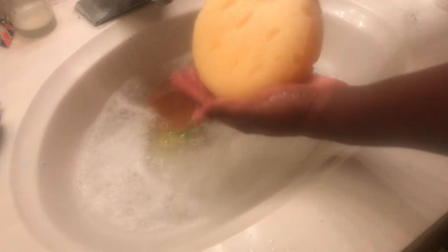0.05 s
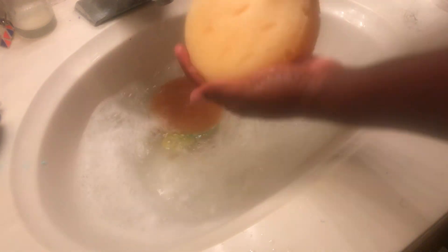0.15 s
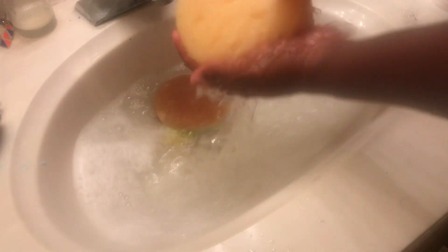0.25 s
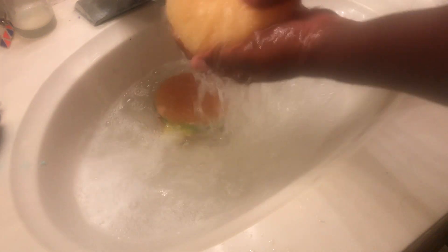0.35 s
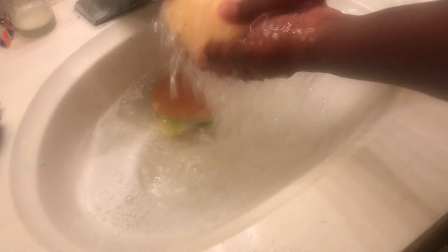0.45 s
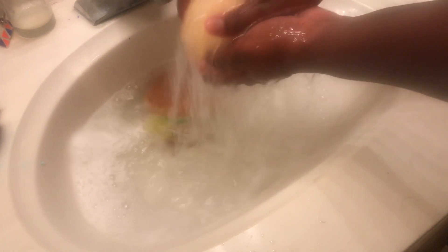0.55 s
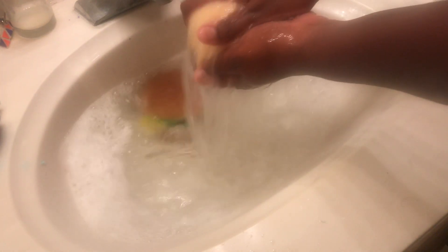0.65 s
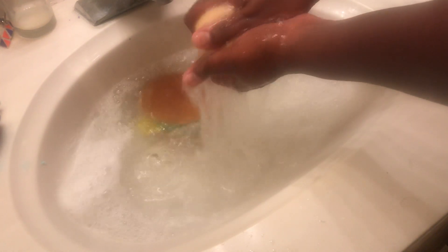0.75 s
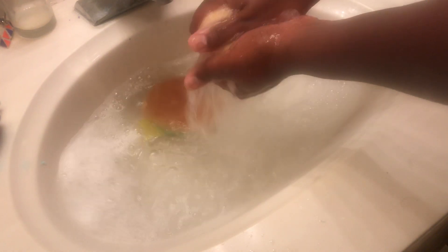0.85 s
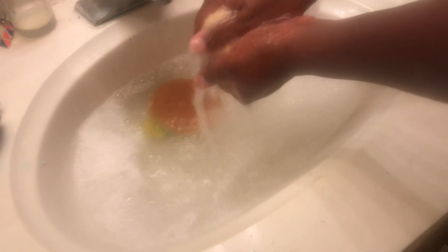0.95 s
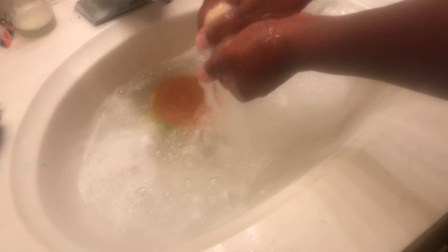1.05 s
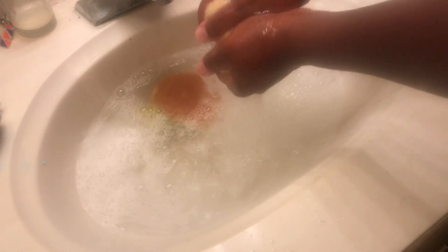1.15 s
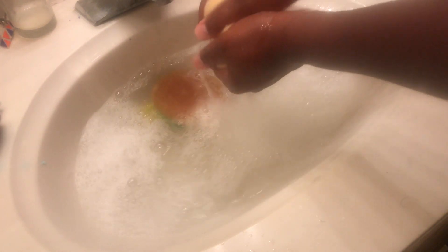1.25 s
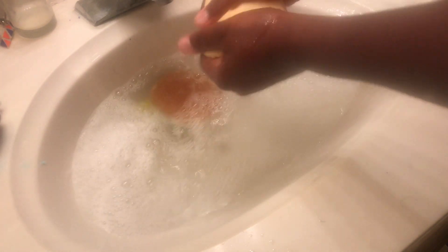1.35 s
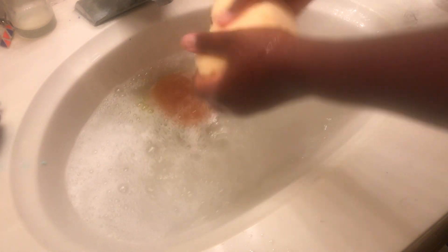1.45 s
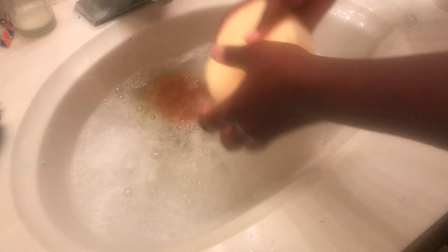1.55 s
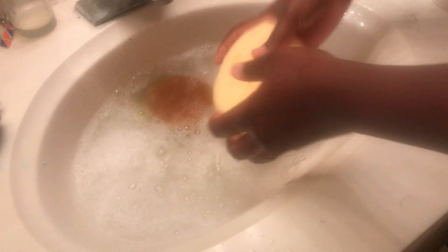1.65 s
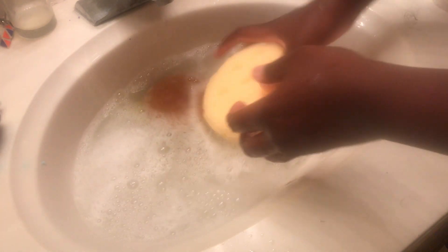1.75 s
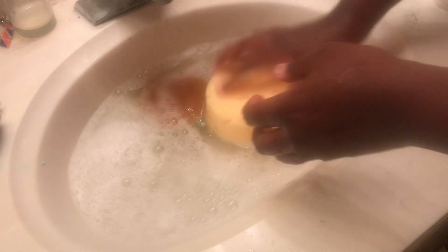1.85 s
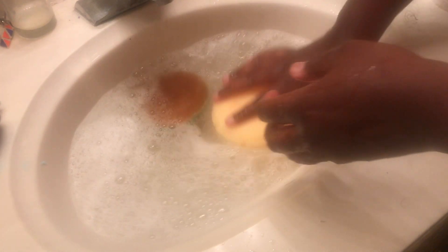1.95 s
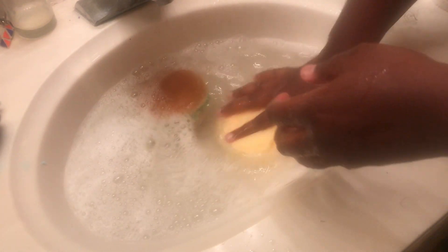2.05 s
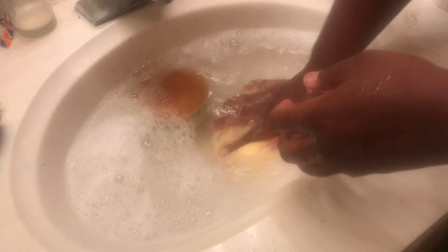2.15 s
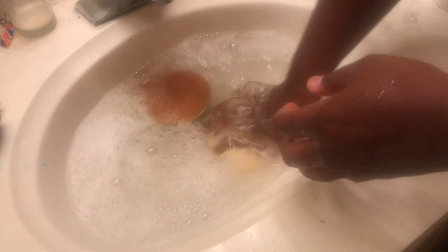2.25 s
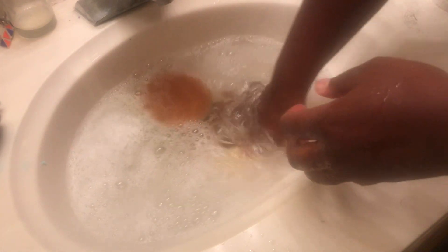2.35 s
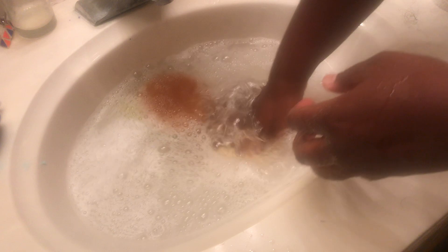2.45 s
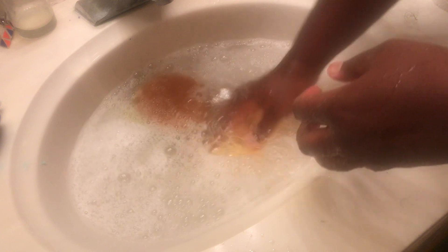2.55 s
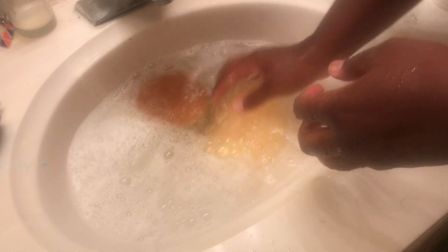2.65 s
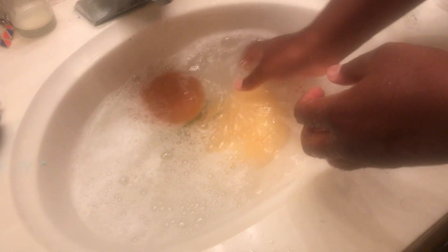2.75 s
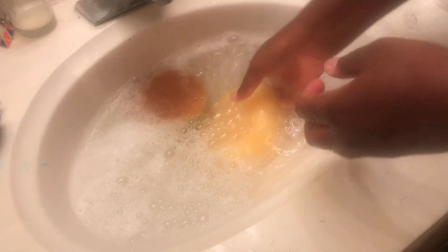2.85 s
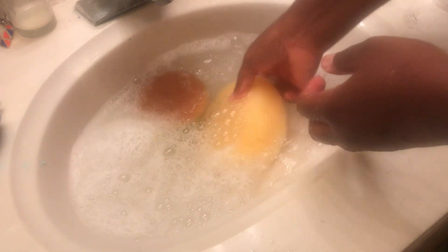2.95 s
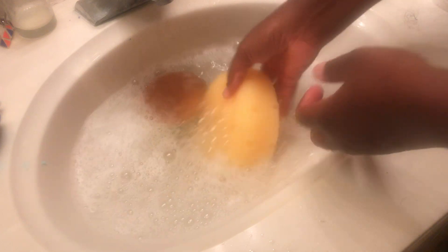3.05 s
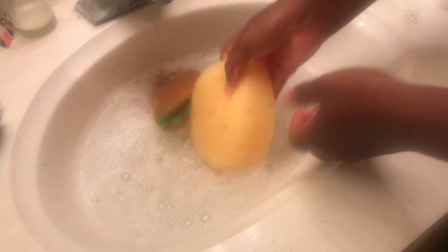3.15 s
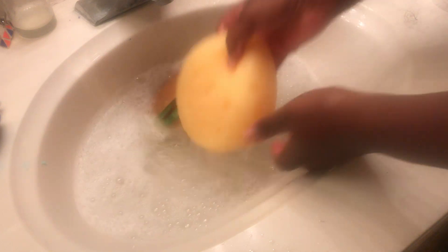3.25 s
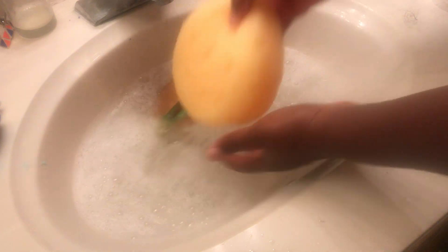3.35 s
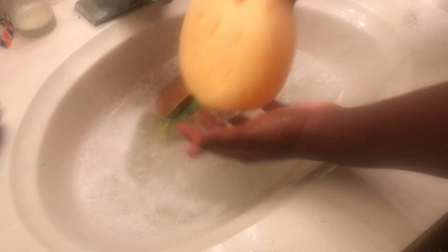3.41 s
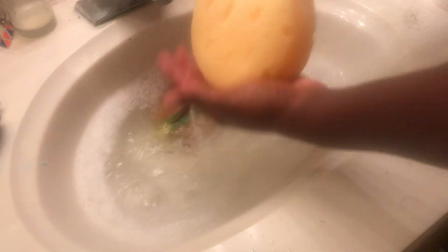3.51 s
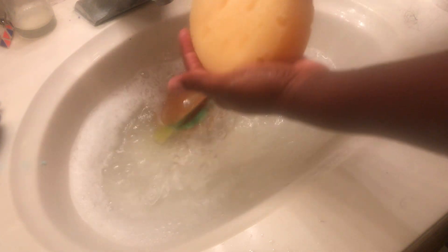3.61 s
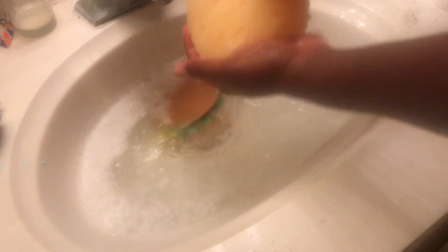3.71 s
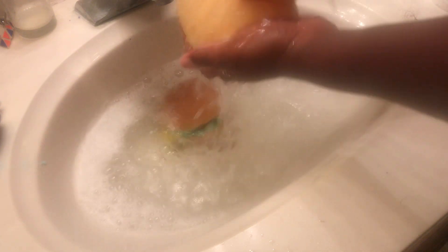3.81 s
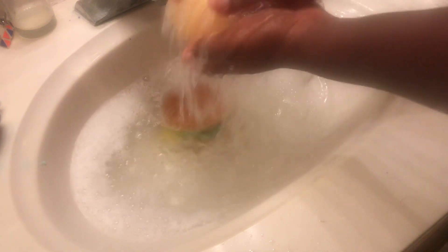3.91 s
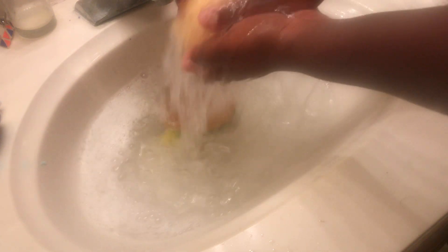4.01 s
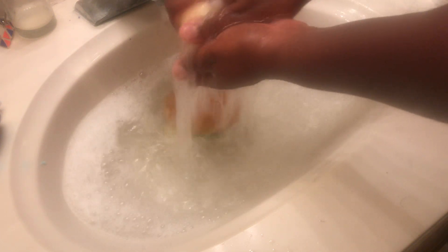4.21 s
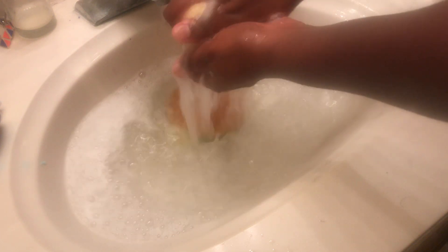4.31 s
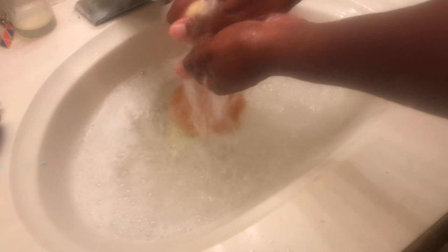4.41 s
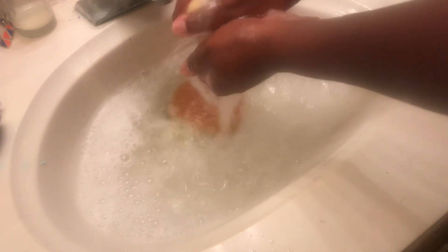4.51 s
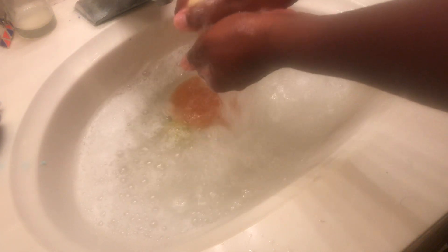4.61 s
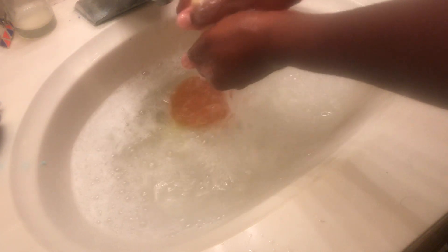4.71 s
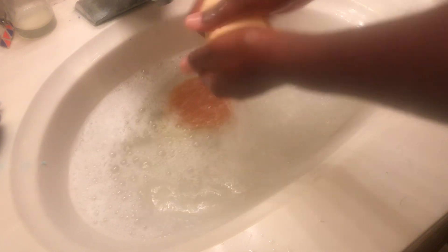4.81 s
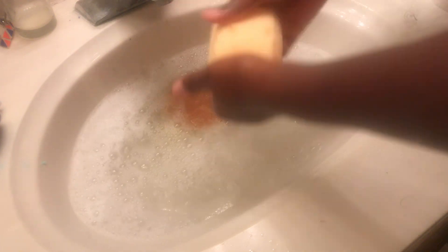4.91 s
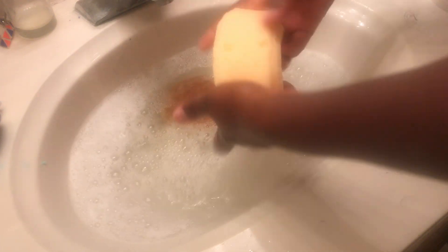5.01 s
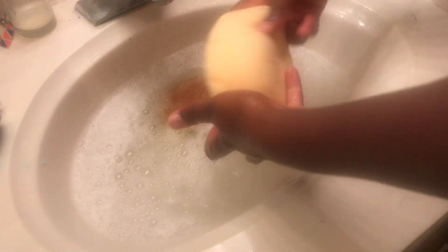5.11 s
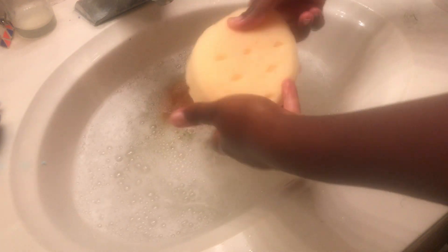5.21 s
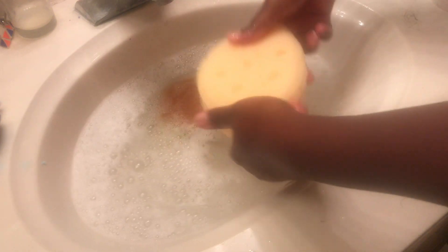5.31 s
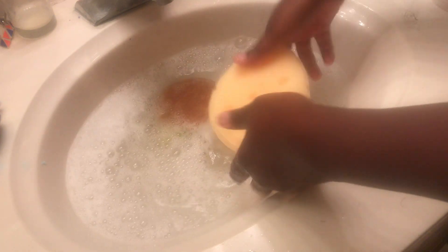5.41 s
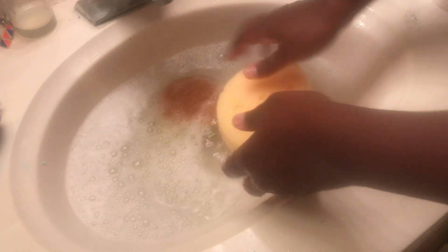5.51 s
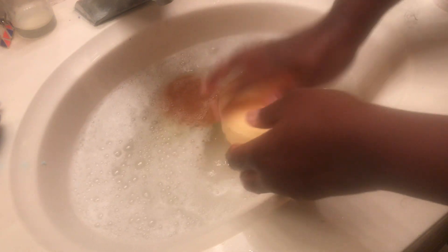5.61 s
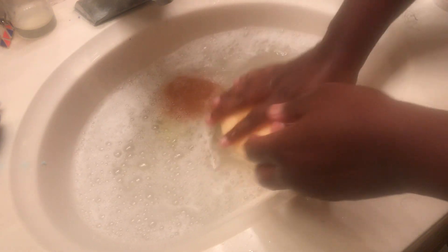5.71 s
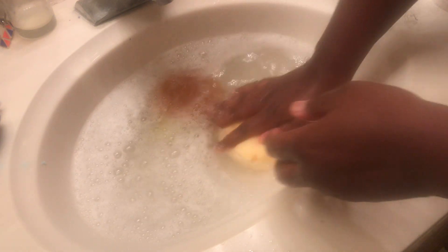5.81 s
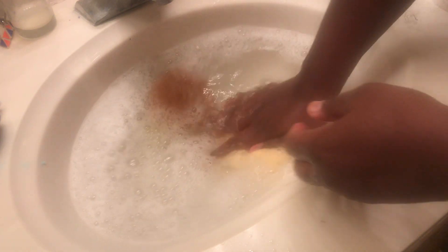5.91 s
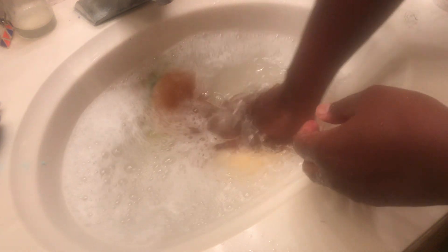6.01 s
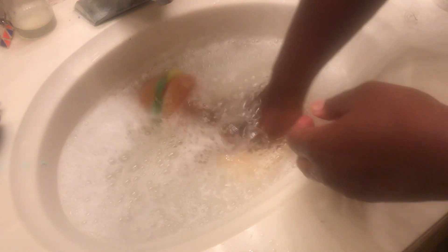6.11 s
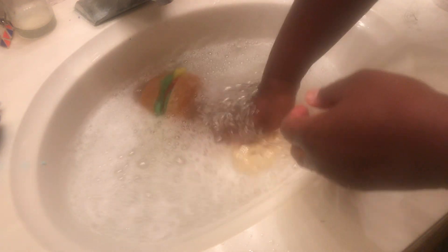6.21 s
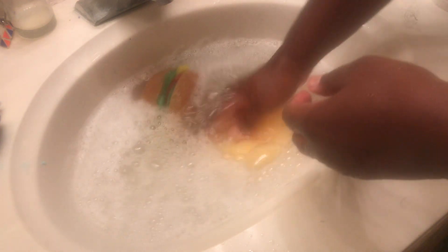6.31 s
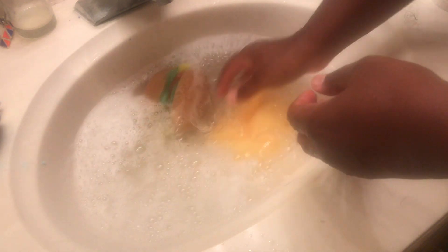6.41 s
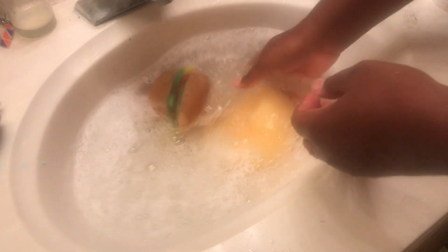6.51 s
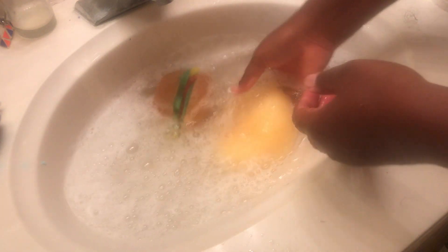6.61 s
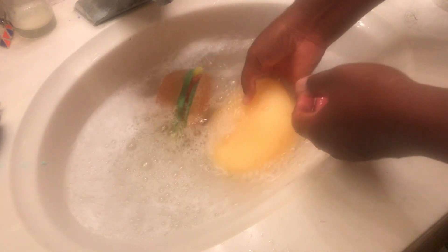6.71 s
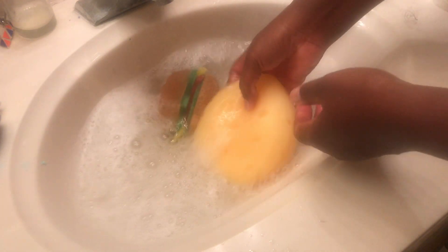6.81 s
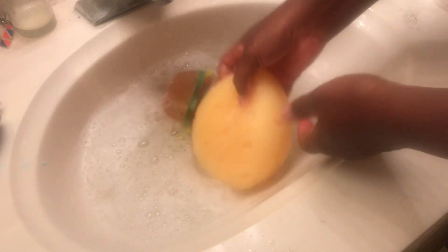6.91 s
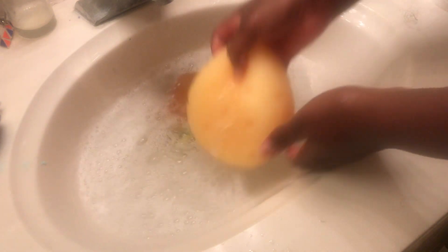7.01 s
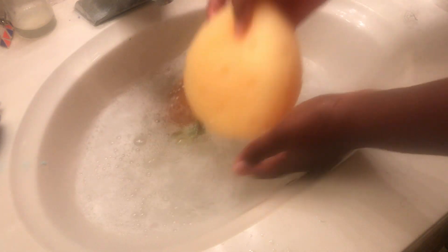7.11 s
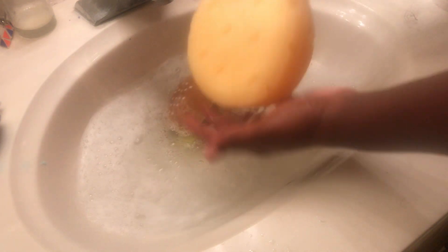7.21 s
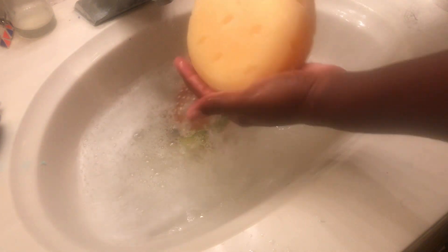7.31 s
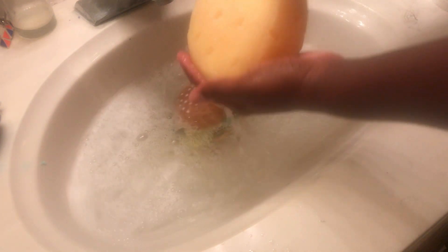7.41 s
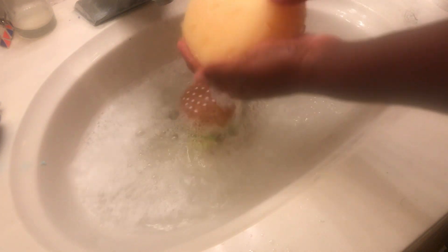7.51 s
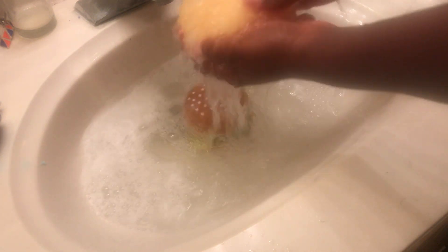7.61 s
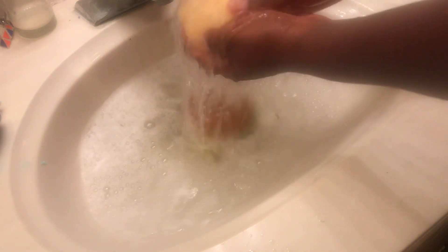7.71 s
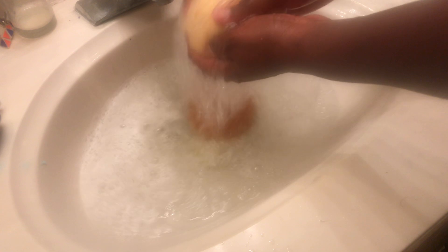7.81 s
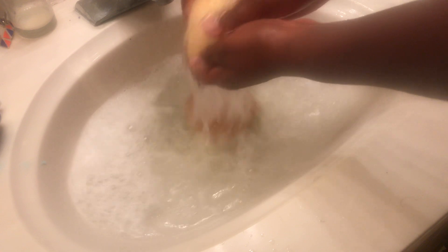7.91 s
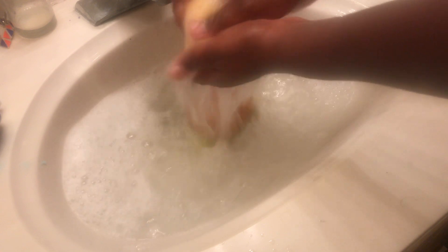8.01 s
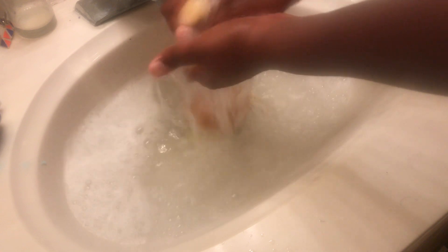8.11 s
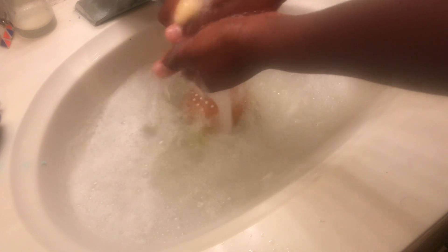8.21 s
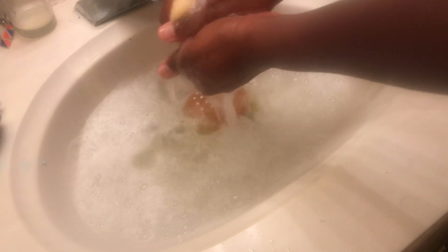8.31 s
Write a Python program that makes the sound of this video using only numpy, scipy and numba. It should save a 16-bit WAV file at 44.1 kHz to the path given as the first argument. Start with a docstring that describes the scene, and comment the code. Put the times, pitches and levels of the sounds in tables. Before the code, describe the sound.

A large soapy sponge is wrung out three times over a sudsy basin, each bright splashing gush thinning to drips, with soft dunking gurgles between.

```python
"""A soapy sponge is wrung out over a bathroom basin, pushed under, wrung, pushed under and wrung again.
Each wringing gushes and then drains: swarms of ringing air bubbles in the suds, under fizzing, ticking foam.
Each dunk gulps, churns and laps, also as bubble swarms; a few big bubbles gurgle as upward sweeps.
Throughout, single drips ring one bubble each, films snap as noise bursts, and still air hums as shaped noise.
Basin resonances and the echoes of a small hard room follow."""
import sys
import numpy as np
from scipy import signal
from scipy.fft import rfft, irfft
from scipy.io import wavfile
from scipy.ndimage import uniform_filter1d
from numba import njit

SR = 44100
rng = np.random.default_rng(int(sys.argv[2]) if len(sys.argv) > 2 else 0)


def file_out(sig):
    """Save sig as 16-bit WAV at sys.argv[1]."""
    # one column per channel
    cols = np.atleast_2d(sig).T
    # limit, then scale
    lim = np.clip(cols, -1, 1)
    pcm = np.round(lim * 32767).astype(np.int16)
    wavfile.write(sys.argv[1], SR, pcm)


N = 368235  # length [samples]

# All source levels are relative: the mix, basin and room add gain.
# Still air: (frequency [Hz], spectral level [dB])
STILL_SPECTRUM = [(20, -35), (45, 5), (70, -1.5), (115, 6.5), (190, -10), (330, -3), (490, -15),
                  (800, -13.5), (1600, -20), (3000, -16.5), (8000, -20), (16000, -24.5)]
# Films snapping, drops slapping: (time [s], nominal band [Hz], level [dB])
SNAPS = [(0.125, 4930, -25.5), (0.1739, 13600, -12.5), (0.305, 6700, -24.5), (0.44, 4500, -29),
         (0.606, 12900, -12.5), (1.124, 8900, -23.5), (1.165, 12000, -18.5), (1.171, 4700, -23.5),
         (1.211, 5960, -22), (1.32, 7950, -32), (1.599, 3680, -24), (1.601, 9800, -29), (2.291, 6900, -36),
         (2.677, 5000, -37), (3.029, 2630, -40.5), (3.16, 6050, -38.5), (3.453, 3980, -38),
         (3.59, 4650, -27.5), (3.612, 5640, -27), (3.702, 5950, -28), (3.945, 6360, -23.5),
         (4.124, 12000, -25), (4.729, 6860, -23), (4.811, 4170, -25), (4.932, 6400, -24.5),
         (4.977, 2480, -39), (5.031, 14800, -23.5), (5.377, 2370, -53), (5.497, 3800, -39.5),
         (6.003, 1660, -41), (6.05, 8000, -34), (6.184, 9900, -34), (6.38, 4500, -33), (6.469, 11100, -33),
         (6.506, 3220, -36.5), (6.596, 4530, -38.5), (6.614, 2570, -41.5), (6.748, 3000, -45),
         (7.176, 2720, -39), (7.37, 4810, -25), (7.467, 8400, -21), (7.648, 5500, -26), (7.743, 2400, -37),
         (7.775, 2360, -23), (7.785, 12000, -15.5)]
# Drips and plops, each trapping a bubble: (time [s], first pitch [Hz], level [dB], decay time [ms])
DRIPS = [(0.034, 1030, -42.5, 12.5), (0.057, 3100, -26, 1.4), (0.125, 2700, -25, 1.4),
         (0.153, 3440, -28, 1.8), (0.235, 1056, -34, 10), (0.239, 3270, -25, 1.8), (0.259, 2400, -21, 1.3),
         (0.346, 617, -40.5, 7.1), (0.445, 5200, -14, 0.7), (0.489, 706, -32.5, 5), (0.521, 3410, -17, 1.9),
         (0.567, 2000, -15, 1.5), (0.697, 1910, -15.5, 3.5), (0.736, 1880, -16, 2.6),
         (0.804, 1064, -21, 8.6), (1.035, 3170, -26, 2.6), (1.11, 2754, -17.5, 1.2),
         (1.377, 580, -32.5, 4.3), (1.38, 263, -35, 8.7), (1.319, 1609, -24, 1.7), (1.497, 1880, -24, 0.69),
         (1.6, 1076, -27, 5.6), (1.601, 2420, -23.5, 1.9), (2.112, 1170, -29.5, 1.7),
         (2.16, 1770, -43, 3.2), (2.256, 174, -24, 5.3), (2.353, 430, -18, 2.5), (2.518, 1690, -34.5, 6.8),
         (2.54, 343, -32.5, 16.4), (2.616, 1460, -18, 3.5), (2.698, 706, -27, 9.6), (2.699, 1420, -21, 2),
         (2.75, 1787, -26, 3), (2.806, 1480, -24.5, 4.7), (3.033, 1670, -24, 1.5), (3.195, 726, -39.5, 5),
         (3.3144, 1670, -19.5, 3.4), (3.486, 1340, -35, 3.9), (3.496, 1094, -25.5, 3.5),
         (3.613, 2210, -21, 1.1), (3.703, 4090, -21.5, 1.2), (3.719, 2800, -33, 2.9),
         (3.834, 1395, -37, 8.2), (3.872, 1860, -34, 4.9), (3.925, 686, -45.5, 27),
         (4.001, 1850, -19.5, 2.6), (4.028, 1610, -15.5, 5.3), (4.12, 1590, -9, 1.8), (4.21, 737, -25, 3.4),
         (4.374, 232, -27, 10.6), (4.728, 1074, -24.5, 1.9), (4.78, 2580, -20.5, 1.3),
         (4.811, 1120, -18.5, 1.9), (5.09, 1070, -17.5, 0.65), (5.378, 1720, -41.5, 2.4),
         (5.56, 1610, -36.5, 2.4), (5.895, 1310, -39, 5.6), (6.008, 198, -27, 13),
         (6.053, 1670, -26.5, 4.2), (6.084, 1480, -18.5, 2.2), (6.13, 620, -30, 2.8),
         (6.154, 1380, -25.5, 3.9), (6.385, 170, -28, 3.9), (6.505, 1830, -37, 3.7),
         (6.596, 1500, -15.5, 1.56), (6.766, 1290, -34, 8), (6.869, 1500, -29, 3), (6.967, 1390, -33, 8.1),
         (7.177, 2040, -17, 1.46), (7.18, 1075, -26.5, 6), (7.322, 1950, -25, 1.6), (7.343, 1770, -26, 3.8),
         (7.372, 1450, -29, 2.4), (7.557, 1000, -29.5, 3.8), (7.59, 703, -34, 5.4), (7.597, 3370, -19, 1.8),
         (7.648, 1760, -28, 4.5), (7.663, 324, -42, 7.8), (7.744, 1750, -22.5, 3.8),
         (7.825, 586, -28.5, 6.8)]
# Big bubbles rising from the sponge: (time [s], length [s], first pitch [Hz], last pitch [Hz], level [dB])
GURGLES = [(2.294, .034, 820, 1740, -31), (2.356, .048, 440, 930, -31), (2.748, .022, 1900, 2750, -40),
           (6.086, .028, 780, 1020, -26)]
# Foam bubbles: (pitch [Hz], spectral level [dB])
FOAM_SPECTRUM = [(4500, -12), (5600, 6.5), (7500, 4.5), (10000, 2), (13000, -4.5), (16500, -7)]
# Hand or sponge stirring the surface: (time [s], hold [s], level [dB])
LAPS = [(1.78, 0.027, -55.5), (2.128, 0.032, -48), (2.25, 0.37, -53.5), (2.66, 0.13, -49.5),
        (2.85, 0.017, -68), (3.119, 0.046, -48), (3.483, 0.018, -49.5), (5.49, 0.016, -69),
        (5.55, 0.01, -67), (5.82, 0.17, -60.5), (6.019, 0.13, -48), (6.374, 0.16, -49), (6.69, 0.3, -59),
        (6.93, 0.12, -58.5), (7.168, 0.15, -48)]
# Bubbles of the stirred surface: (pitch [Hz], spectral level [dB])
LAP_SPECTRUM = [(950, -1), (1400, 4.5), (1900, -1.5), (2600, -3.5), (3600, -10.5), (5500, -19.5)]
# Sponge pushed under: (time [s], hold [s], gulp level [dB], churn level [dB])
PLUNGES = [(2.21, 0.19, -37, -43.5), (2.6, 0.02, -51.5, -65), (3.22, 0.012, -56.5, -73),
           (5.993, 0.072, -33.5, -37.5)]
# Air gulped by the sponge: (pitch [Hz], spectral level [dB])
GULP_SPECTRUM = [(55, -19), (120, 5), (175, -8.5), (260, -4.5), (450, 0.5)]
# Water churning over the sponge: (pitch [Hz], spectral level [dB])
CHURN_SPECTRUM = [(400, -18), (600, -1), (900, 10.5), (1200, 3.5)]
# Sponge wrung out: (lifted [s], full grip [s], grip hold [s], let go [s], full emptying rate [dB/s],
# splash level [dB], deep-bubble level [dB], foam level [dB])
SQUEEZES = [(0.0, 0.547, 0.22, 1.575, 38.5, -30.5, -42.5, -36),
            (3.529, 4.022, 0.17, 5.01, 24.5, -33, -45, -36),
            (7.275, 7.815, 0.11, 8.35, 27.5, -32, -46, -36)]
SPLASH_COLUMN, DEEP_COLUMN, FOAM_COLUMN = 5, 6, 7
# Large bubbles dragged down by thick strands: (pitch [Hz], spectral level [dB])
DEEP_SPECTRUM = [(55, -2.5), (115, -1.5), (165, -14), (240, 4.5), (330, 0), (430, -2), (490, -6.5),
                 (600, 5), (850, -9)]
# Bubbles of the splashing strands: (pitch [Hz], spectral level [dB])
SPLASH_SPECTRUM = [(750, -3.5), (950, -4.5), (1100, -2.5), (1700, 0), (2400, -5.5), (3200, -3.5),
                   (4500, -10), (6000, -13)]
# Small bubbles of lone drops: (pitch [Hz], spectral level [dB])
STRAY_SPECTRUM = [(950, -6), (1800, -3.5), (3200, -0.5), (5000, -4)]
# Bowl and low room modes: (frequency [Hz], bandwidth [Hz], level [dB])
BASIN_MODES = [(114.4, 4.2, -5), (150, 10, -6.5), (186, 30, -8), (322, 20, -1), (580, 39, 0),
               (1063, 19.5, 0), (1414, 14, -10.5), (1881, 87, -9)]
# Reverberation: (frequency [Hz], 60 dB decay time [s])
ROOM_T60 = [(150, 0.68), (500, 0.47), (1400, 0.41), (3500, 0.57), (9000, 0.25), (16000, 0.18)]
# Microphone response: (frequency [Hz], gain [dB])
MICROPHONE = [(20, -2.5), (6500, -1.5), (7500, -4.5), (9300, -1), (10400, -4), (11500, 1), (13000, 3),
              (16000, 3)]

STILL_DB = -58
SNAP_DECAY_S, SNAP_SLOPE = 0.028, 1.54  # decay time at 1 kHz; brighter films go sooner
CALM_LAP_DB, CALM_FOAM_DB = -76.5, -68.5  # the suds never quite rest
LAP_RISE_S, LAP_FADE_DB_PER_S = 0.0067, 75.5
PUSH_RISE_S, CHURN_LAG_S = 0.016, 0.078  # churning follows the gulp
GRIP_S, STOP_DB_PER_S = 0.085, 99  # closing time constant; extra fade once the hands open
EDGE_HZ = 16000  # upper band limit


def amp(db):
    """Decibels to linear gain."""
    return 10 ** (np.asarray(db) / 20)


def rms(x):
    """Root mean square, kept above zero."""
    return np.sqrt(np.mean(x ** 2) + 1e-20)


def read(points, hz):
    """Interpolates a curve linearly over log frequency."""
    f, value = np.transpose(points)
    return np.interp(np.log(hz + 1), np.log(f + 1), value)


def add(mix, start_s, sound):
    """Mixes a sound in at its start time."""
    part = mix[max(round(start_s * SR), 0):][:len(sound)]
    part += sound[:len(part)]


def colour(x, points):
    """Filters by a gain curve, in the frequency domain."""
    return irfft(rfft(x) * amp(read(points, np.fft.rfftfreq(N, 1 / SR))), N)


@njit
def ring(start_s, hz, size, decay_s, rise, swell):
    """Sums bubbles: each builds over swell cycles, dies away, and rises in pitch as it nears the surface."""
    out = np.zeros(N)
    for k in range(len(start_s)):
        first = int(start_s[k] * SR)
        for i in range(min(int(6 * decay_s[k] * SR), N - first)):
            age = i / SR / decay_s[k]
            turns = hz[k] * i / SR * (1 + rise * age / 2)
            envelope = (1 - np.exp(-turns / swell)) * np.exp(-age)
            out[first + i] += size[k] * envelope * np.sin(2 * np.pi * turns)
    return out


def swarm(gain, spectrum, per_s, cycles, spread_db, rise, crowding):
    """Random bubbles of all sizes; a stronger flow makes both more and louder ones."""
    when, pitch, luck, rarity, life = rng.random((int(per_s * N / SR), 5)).T
    strength = gain[(when * N).astype(int)]
    share = (strength / gain.max()) ** crowding  # chance that a candidate is born
    lowest_hz, highest_hz = spectrum[0][0], spectrum[-1][0]
    hz = lowest_hz * (highest_hz / lowest_hz) ** pitch
    level_db = read(spectrum, hz) + spread_db * np.minimum(-np.log(1 - rarity), 3.7)
    # small bubbles are brief, so they need more height for the same energy
    size = strength / np.sqrt(share) * hz * amp(level_db)
    decay_s = cycles * (.5 + life) / hz
    born = luck < share
    sound = ring(when[born] * N / SR, hz[born], size[born], decay_s[born], rise, swell=0.56)
    # little sound leaves the water below the note of the largest bubble
    sound = signal.sosfilt(signal.butter(2, lowest_hz, "high", fs=SR, output="sos"), sound)
    return sound * rms(gain) / rms(sound)


def spurts(per_s, strength, fade_s):
    """Water arrives in lumps: each one briefly stirs bubbles of every size at once."""
    lumps = rng.uniform(0.31, 1, N) * (rng.random(N) < per_s / SR)
    surge = 1 + strength * signal.lfilter([1], [1, -np.exp(-1 / (fade_s * SR))], lumps)
    return surge / rms(surge)


def stroke(start_s, hold_s, db, rise_s, fade_db_per_s):
    """Gain of one movement in the water: it builds, holds and settles."""
    age_s = np.arange(N) / SR - start_s
    fade_db = fade_db_per_s * np.maximum(age_s - rise_s - hold_s, 0)
    return np.clip(age_s / rise_s, 0, 1) * amp(db - fade_db)


def lapping():
    """Gain of the stirred surface: strokes over a constant calm level."""
    strokes = [stroke(s, hold_s, db, LAP_RISE_S, LAP_FADE_DB_PER_S) for s, hold_s, db in LAPS]
    return amp(CALM_LAP_DB) + sum(strokes)


def flow(column, grip_s, drain_share, lag_s, dribble_db):
    """Gain of water leaving the sponge: a dribble, a gush as the hands close, then ever less as it empties."""
    t, out = np.arange(N) / SR, np.zeros(N)
    for row in SQUEEZES:
        lifted_s, full_s, hold_s, let_go_s, drain_db_per_s = row[:5]
        full_s = full_s + lag_s
        slack = 1 - np.exp(-np.maximum(full_s - t, 0) / grip_s)
        drained_db = drain_share * drain_db_per_s * np.maximum(t - full_s - hold_s, 0)
        stopped_db = STOP_DB_PER_S * np.maximum(t - let_go_s, 0)
        out += (t >= lifted_s) * amp(row[column] + dribble_db * slack - drained_db - stopped_db)
    return out


def still_air():
    """The still room: steady noise shaped by a fixed spectrum."""
    air = colour(rng.standard_normal(N), STILL_SPECTRUM)
    return amp(STILL_DB) * air / rms(air)


def snaps():
    """Soap films snap and drops slap: very short broad noise bursts."""
    out, t = np.zeros(N), np.arange(2048) / SR
    for s, hz, db in SNAPS:
        edges_hz = [hz / 2.44, min(hz * 1.69, EDGE_HZ)]
        band = signal.butter(2, edges_hz, "band", fs=SR, output="sos")
        age = t / SNAP_DECAY_S * (hz / 1000) ** SNAP_SLOPE
        fade = np.exp(-age) * (1 - np.exp(-6 * age))
        burst = signal.sosfilt(band, rng.standard_normal(len(t)) * fade)
        add(out, s, amp(db) * burst * rms(fade) / rms(burst))
    return out


def drips():
    """Each drip rings one clear bubble."""
    start_s, hz, db, decay_ms = np.transpose(DRIPS)
    return ring(start_s, hz, amp(db), decay_ms / 1000, rise=0.018, swell=0.7)


def gurgles(rough):
    """An air pocket shrinks and surfaces: its note sweeps up while its loudness wobbles."""
    out = np.zeros(N)
    for s, length_s, first_hz, last_hz, db in GURGLES:
        hz = np.linspace(first_hz, last_hz, int(length_s * SR))
        wobble = uniform_filter1d(rng.standard_normal(SR // 8), size=130)
        loudness = 1 + rough * wobble[:len(hz)] / rms(wobble)
        note = loudness * np.sin(2 * np.pi * np.cumsum(hz) / SR)
        add(out, s, amp(db) * signal.windows.tukey(len(hz), .7) * note)
    return out


def foam(surge, stirred):
    """Tiny bubbles fizz, and bursting films tick across the treble."""
    wrung = flow(FOAM_COLUMN, grip_s=0.082, drain_share=0.79, lag_s=0.0069, dribble_db=-18)
    gain = (wrung + amp(-15) * stirred + amp(CALM_FOAM_DB)) * surge
    fizz = swarm(gain, FOAM_SPECTRUM, per_s=5000, cycles=7.9, spread_db=3.0, rise=0.0032, crowding=0.2)
    ticks = swarm(gain, FOAM_SPECTRUM, per_s=1600, cycles=0.73, spread_db=7.5, rise=0.011, crowding=0.25)
    return amp(-0.1) * fizz + amp(-6.0) * ticks


def dunk(surge, stirred):
    """The sponge gulps air as it goes under; water churns over it and laps at the basin."""
    sucked = sum(stroke(s, hold_s, gulp_db, PUSH_RISE_S, fade_db_per_s=86)
                 for s, hold_s, gulp_db, _ in PLUNGES)
    closing = sum(stroke(s + CHURN_LAG_S, hold_s, churn_db, PUSH_RISE_S, fade_db_per_s=77)
                  for s, hold_s, _, churn_db in PLUNGES)
    gulp = swarm(sucked + amp(-17) * stirred, GULP_SPECTRUM,
                 per_s=650, cycles=0.45, spread_db=-0.5, rise=0.13, crowding=0.12)
    churn = swarm(closing + amp(-7.5) * stirred, CHURN_SPECTRUM,
                  per_s=500, cycles=3.6, spread_db=-1.0, rise=0.039, crowding=0.097)
    lap = swarm(stirred * surge, LAP_SPECTRUM,
                per_s=1500, cycles=5.5, spread_db=4.5, rise=0.058, crowding=.15)
    return amp(-3.5) * gulp + amp(-2.5) * churn + amp(2.0) * lap


def pour(surge):
    """Strands splash into the suds; thick ones drag large bubbles down, and stray drops fall beside them."""
    sinking = flow(DEEP_COLUMN, grip_s=0.2, drain_share=0.65, lag_s=0.065, dribble_db=-29)
    falling = flow(SPLASH_COLUMN, grip_s=GRIP_S, drain_share=0.94, lag_s=0, dribble_db=-24)
    dripping = flow(SPLASH_COLUMN, grip_s=GRIP_S, drain_share=0.62, lag_s=0, dribble_db=-11.5)
    deep = swarm(sinking * surge, DEEP_SPECTRUM,
                 per_s=700, cycles=2.46, spread_db=3.5, rise=0.045, crowding=.25)
    splash = swarm(falling * surge, SPLASH_SPECTRUM,
                   per_s=2600, cycles=3.1, spread_db=2.5, rise=0.032, crowding=.25)
    stray = swarm(dripping * surge, STRAY_SPECTRUM,
                  per_s=220, cycles=4.8, spread_db=3.0, rise=0.024, crowding=0.11)
    return amp(2.0) * deep + amp(2.0) * splash + amp(-7) * stray


def basin(x):
    """The bowl and the room's low modes ring on: one complex resonator per note."""
    out = x.copy()
    for hz, width_hz, db in BASIN_MODES:
        r = np.exp(-np.pi * width_hz / SR)
        pole = r * np.exp(2j * np.pi * hz / SR)
        out += amp(db) * 2 * signal.lfilter([1 - r], [1, -pole], x).real
    return out


def echo(near_db, near_s, tail_db):
    """One spot's response: quick reflections off the porcelain, then the tail of a small hard room."""
    t = np.arange(SR // 2) / SR
    near, far = rng.standard_normal((2, len(t))) * (rng.random((2, len(t))) < 5000 / SR)
    near *= (t > .0005) * np.exp(-t / near_s)
    hz, age_s, bins = signal.stft(far * (t > .006), SR, nperseg=256)
    decay = amp(-60 * age_s / read(ROOM_T60, hz)[:, None])
    tail = signal.istft(bins * decay, SR, nperseg=256)[1][:len(t)]
    return amp(near_db) * near / np.linalg.norm(near) + amp(tail_db) * tail / np.linalg.norm(tail)


def room(x, near_db, near_s, tail_db, count=4):
    """The water lands now here, now there: the sound circles 7 times a second through spots with own echoes."""
    turn = 2 * np.pi * 7 * np.arange(N) / SR
    out = x.copy()
    for k in range(count):
        share = np.maximum(np.cos(turn + 2 * np.pi * k / count), 0)
        out += signal.oaconvolve(x * share, echo(near_db, near_s, tail_db))[:N]
    return out


def scene():
    """Single sounds get stronger, quicker reflections; swarms weaker but longer near ones and a weaker tail."""
    air = still_air()
    surge, stirred = spurts(per_s=40, strength=1.6, fade_s=0.0072), lapping()
    singles = drips() + snaps() + gurgles(rough=0.21)
    singles_in_room = room(basin(singles), near_db=-5.5, near_s=0.0059, tail_db=-6.5)
    swarms = amp(-2.0) * (foam(surge, stirred) + dunk(surge, stirred) + pour(surge))
    swarms_in_room = room(basin(swarms), near_db=-7, near_s=0.014, tail_db=-8.0)
    return (air + singles_in_room + swarms_in_room)[None]


def record(dry):
    """The microphone drops the deepest bass and colours the treble; then the band limit."""
    thinned = signal.sosfilt(signal.butter(2, 38, "high", fs=SR, output="sos"), dry[0])
    edge = signal.firwin(511, EDGE_HZ, window=("kaiser", 9), fs=SR)
    return signal.oaconvolve(colour(thinned, MICROPHONE), edge, "same")[None]


dry = scene()
out = record(dry)
file_out(out)
```